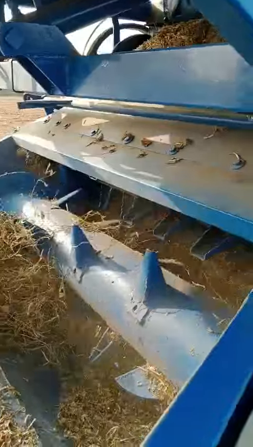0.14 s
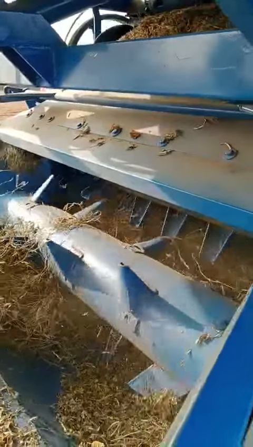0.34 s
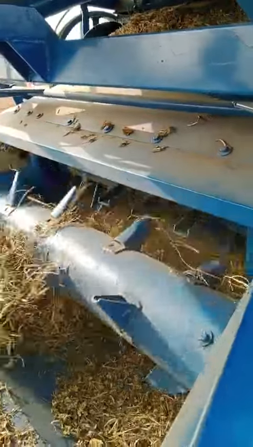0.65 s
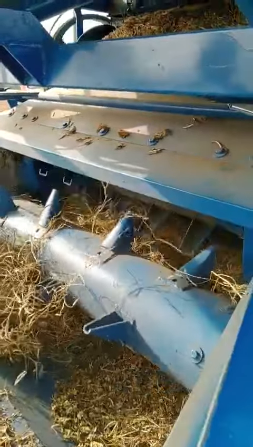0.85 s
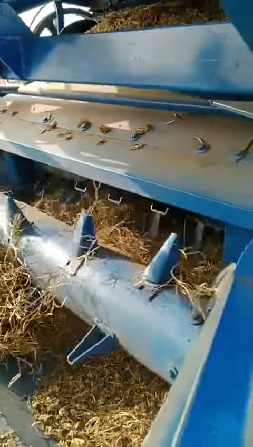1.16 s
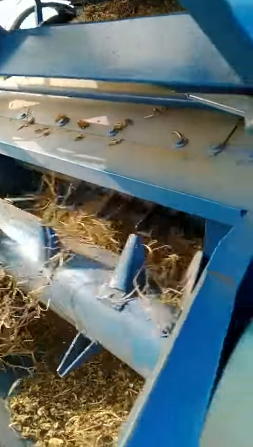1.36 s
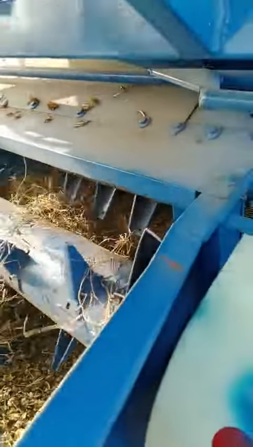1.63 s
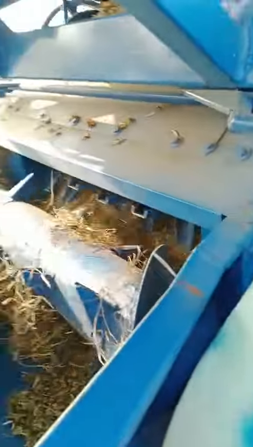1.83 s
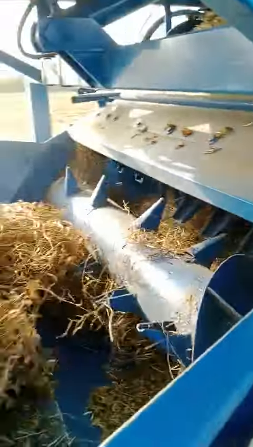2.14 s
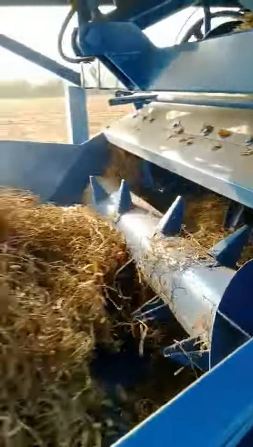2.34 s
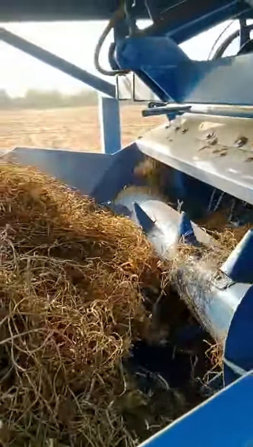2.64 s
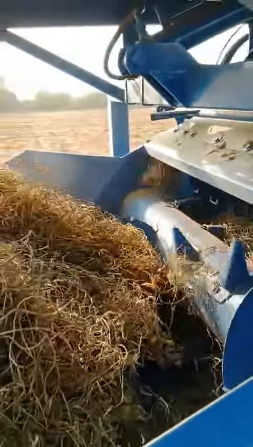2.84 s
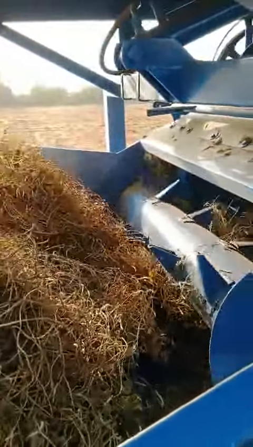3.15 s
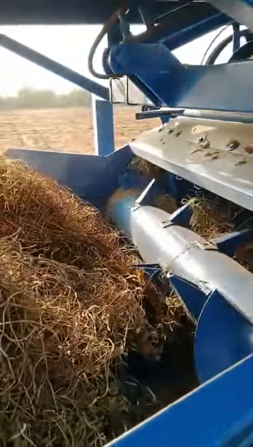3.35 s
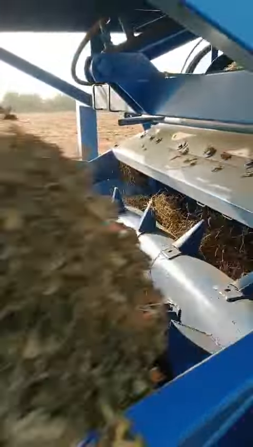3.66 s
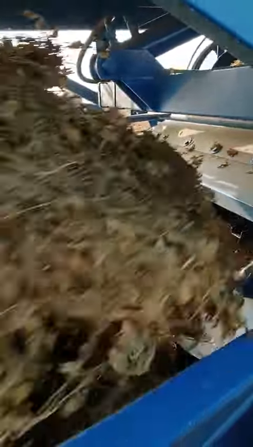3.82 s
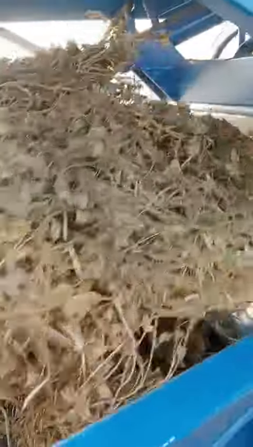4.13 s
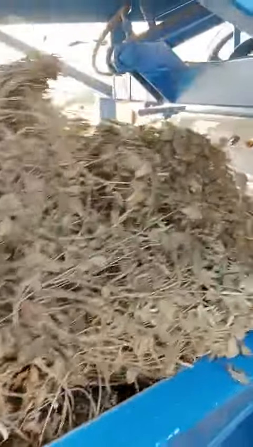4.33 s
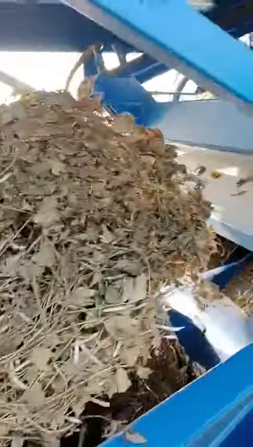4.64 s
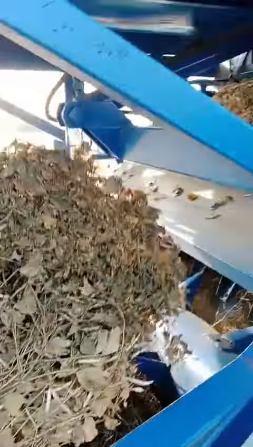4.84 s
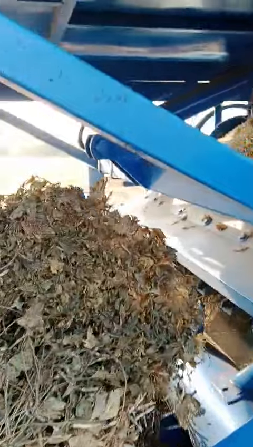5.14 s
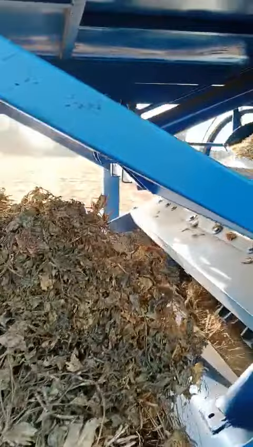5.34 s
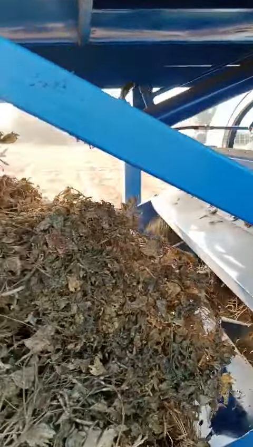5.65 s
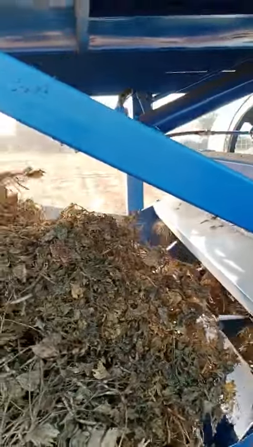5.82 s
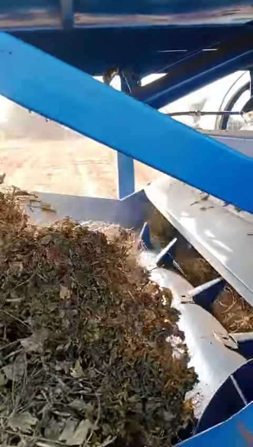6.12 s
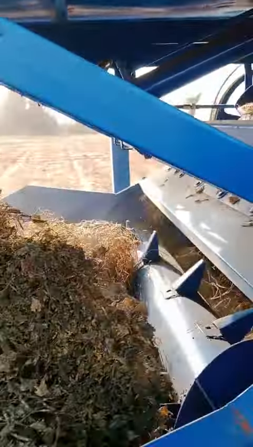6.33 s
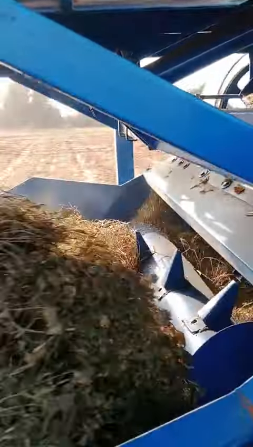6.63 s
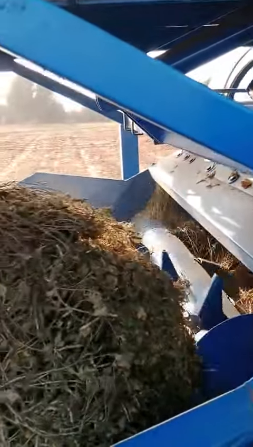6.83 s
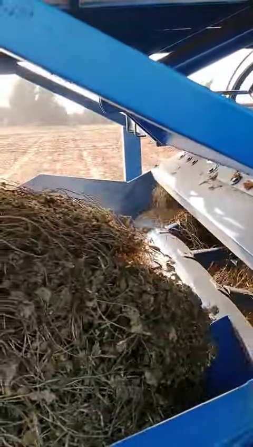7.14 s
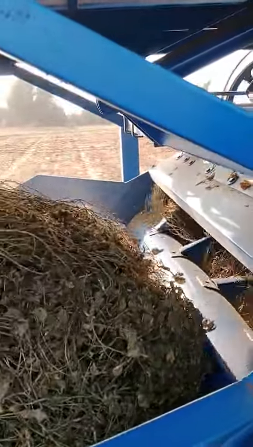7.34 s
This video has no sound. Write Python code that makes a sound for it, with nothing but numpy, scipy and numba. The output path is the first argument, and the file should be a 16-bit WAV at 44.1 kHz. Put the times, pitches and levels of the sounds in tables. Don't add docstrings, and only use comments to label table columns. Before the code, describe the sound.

A tractor-driven thresher roars steadily over a droning diesel, its steel casing knocking and ringing as dry crop rattles, ticks and snaps through.

```python
import sys
import numpy as np
from scipy import signal
from scipy.fft import rfft, irfft
from scipy.io import wavfile
from scipy.ndimage import uniform_filter1d
from numba import njit

SR = 44100
rng = np.random.default_rng(int(sys.argv[2]) if len(sys.argv) > 2 else 0)


def gain_from_db(level_db):
    decades = np.asarray(level_db, float) / 20
    return 10 ** decades


def file_out(sig):
    cols = np.atleast_2d(sig).T
    lim = np.clip(cols, -1, 1)
    pcm = np.round(lim * 32767).astype(np.int16)
    wavfile.write(sys.argv[1], SR, pcm)


N = 329868


def level(x, db):
    return x * gain_from_db(db) / np.sqrt(np.mean(x ** 2))


@njit
def svf(x, hz, width):
    y, band, low = np.empty(len(x)), 0., 0.
    g, k = np.tan(np.pi * hz / SR), width / hz
    for i in range(len(x)):
        v = (band + g * (x[i] - low)) / (1 + g * (g + k))
        band, low = 2 * v - band, low + 2 * g * v
        y[i] = k * v
    return y


def svf_twice(x, hz, width, second_width):
    return svf(svf(x, 1. * hz, 1. * width), 1. * hz, 1. * second_width)


def noise():
    return rng.standard_normal(N)


def walk(rate):
    hold = int(SR / rate)
    steps = np.repeat(rng.standard_normal(N // hold + 1), hold)
    return 1.42 * uniform_filter1d(uniform_filter1d(steps, hold), hold)[:N]


def flutter(rate):
    w = walk(rate)
    return w - uniform_filter1d(w, SR // 4)


def shape(hz, spectrum):
    f, db = np.transpose(spectrum)
    return gain_from_db(np.interp(np.log(hz + 1), np.log(f), db))


def colour(x, spectrum):
    return irfft(rfft(x) * shape(np.arange(N // 2 + 1) * SR / N, spectrum), N)


def knocks(rate, scatter_db):
    hit, size, sign = rng.random((3, N))
    return (hit < rate / SR) * gain_from_db(-scatter_db * np.log(1 - .97 * size)) * np.sign(sign - .5)


def bursts(times, peaks_db, lengths, rise):
    env, t = np.zeros(N), np.arange(SR // 2) / SR
    for s, db, length in zip(times, peaks_db, lengths):
        at = int(s * SR)
        blow = np.minimum(t / rise, 1) * np.exp(-(t / length) ** 1.77)
        env[at:at + len(t)] += (gain_from_db(db) * blow)[:N - at]
    return env


def thud(table, hz, width, gain_db, t60):
    s, db, _ = np.transpose(table)
    contact = level(svf_twice(noise(), hz, width, width), gain_db)
    return contact * bursts(s - .001, db, t60 / 5 + 0 * s, .0035)


def rings(table, gain_db, rise, t60):
    out, t = np.zeros(N), np.arange(SR // 2) / SR
    for s, db, f in table:
        at = int(s * SR)
        pair = np.sin(2 * np.pi * f * t) + .6 * np.sin(2 * np.pi * 1.035 * f * t)
        ring = pair * np.minimum(t / rise, 1) * 1000 ** (-t / t60)
        out[at:at + len(t)] += gain_from_db(db + gain_db) * ring[:N - at]
    return out


def panels(modes):
    out = 0
    for hz, width, db in modes:
        rain = knocks(300, 2.8) * gain_from_db(1.7 * flutter(8.7))
        out = out + level(svf_twice(rain, hz, width, 3.45 * width), db)
    return out


def curves(table):
    s, *columns = np.transpose(table)
    return (np.interp(np.arange(N) / SR, s, c) for c in columns)


def swells(table, rise, fall):
    s, *columns = np.transpose(table)
    late = np.arange(0, N + 64, 64)[:, None] / SR - s
    bell = np.exp(-(late / np.where(late < 0, rise, fall)) ** 2)
    return (np.interp(np.arange(N) / 64, np.arange(len(bell)), bell @ c) for c in columns)


# (time [s], firing rate [Hz])
SPEED = [
    (0, 50.68),
    (.75, 50.7),
    (1.75, 50.82),
    (2.25, 50.96),
    (2.75, 51.08),
    (4.25, 51.13),
    (5.5, 51.08),
    (6.75, 51.05),
    (7.48, 50.94),
]


def tones(table, waver_db, rate):
    hz, = curves(SPEED)
    turns = np.cumsum(hz) / SR
    out = 0
    for k, db in table:
        strength = gain_from_db(db + waver_db * min(k / 4, 1) * walk(rate))
        out = out + strength * np.sin(2 * np.pi * (k * turns + rng.random()))
    return out * np.sqrt(2)


# (order of the four-firing cycle [count], level [dB])
EXHAUST_ORDERS = [(4, -42), (8, -40), (9, -44), (11, -39), (12, -32), (13, -43), (14, -42), (16, -41),
                  (17, -43), (20, -38), (21, -41), (24, -36), (26, -41), (32, -47), (40, -46)]
# (speed [turns a firing], level [dB])
SHAFTS = [(1.145, -49), (1.371, -50), (1.429, -47), (1.622, -40), (1.713, -46), (4.856, -42), (5.903, -40),
          (6.098, -42), (6.56, -40)]


def diesel():
    exhaust = [(k / 4, db) for k, db in EXHAUST_ORDERS]
    return tones(exhaust + SHAFTS, 2.0, 3)


# (speed [turns a firing], level [dB])
GEAR_MESH = [(6.99, -1), (7.122, -1), (7.228, 0)]


def gears():
    return level(tones(GEAR_MESH, 2.04, 6), 0)


# (frequency [Hz], density [dB per Hz])
CHAFF = [(1500, -11), (2500, -18), (4000, -16), (6000, -3), (7600, 4), (9000, 1), (9350, -7), (9700, 3),
         (10200, 3.5), (11500, -2.5), (12800, 0), (16000, -5)]


def chaff(surge):
    ticks = signal.lfilter([1], [1, -.3], knocks(2500, 3.1)) * gain_from_db(0.56 * walk(22))
    hiss = noise() * gain_from_db(0.75 * flutter(18))
    return level(colour((level(ticks, -5) + hiss) * gain_from_db(0.64 * surge), CHAFF), 0)


# (time [s], level [dB])
RUSTLE = [
    (3.36, -55),
    (3.43, -34.5),
    (3.6, -30.5),
    (3.78, -29),
    (3.92, -33),
    (4.05, -40),
    (4.15, -60),
]


def rustle():
    grains = signal.lfilter([1], [1, -.985], np.abs(knocks(1800, 3.5)))
    db, = curves(RUSTLE)
    return gain_from_db(db) * level(colour(grains * noise(), CHAFF), 0)


# (time [s], peak level [dB])
SNAPS = [(0.475, -15), (0.937, -18), (1.997, -19), (2.729, -20), (4.949, -21), (5.875, -16), (6.512, -19),
         (6.9, -21), (7.03, -21), (7.08, -19), (7.386, -21), (3.4735, -19), (3.4894, -16), (3.5294, -15),
         (3.6164, -16), (3.6214, -21), (3.6494, -25), (3.6794, -21), (3.76, -16), (3.7714, -19),
         (3.7898, -13), (3.8854, -18)]


def snaps():
    s, db = np.transpose(SNAPS)
    return level(colour(noise(), CHAFF), -13.0) * bursts(s, db, 0.003 + 0 * s, .0004)


# (frequency [Hz], width [Hz], level [dB])
LOOSE_SHEET = [(613, 130, -1), (900, 105, 1.5), (1180, 150, -1), (1560, 160, -3), (2020, 180, -7.5)]


def clatter():
    clump = gain_from_db(6.5 * flutter(9))
    out = 0
    for hz, width, db in LOOSE_SHEET:
        out = out + level(svf_twice(knocks(70, 3.5) * clump, hz, width, 2 * width), db)
    return level(out, 0)


# (time [s], peak level [dB], body level [dB re peak], dust level [dB re peak])
SLAPS = [(0.129, -21, -15, -10), (0.477, -17.5, -3.5, -4), (0.493, -27.5, -7, -13), (0.9, -31, 1, -8),
         (0.936, -18.5, -7.5, -10), (0.955, -31, 3, -10), (1.33, -35, 2, -6), (1.415, -36, 2, -6),
         (6.9, -32, -10, 0), (0.645, -34, -2, -8), (1.128, -27, -19, -12), (1.215, -34, -4, -6),
         (1.94, -29, -6, -11), (1.992, -31.5, -11, 5), (2.7284, -22.5, -13, -13), (2.916, -34, -11, -11),
         (3.3594, -27.5, -6, -14), (3.417, -23.5, -7, -8), (4.0612, -27, -13, -11), (4.2614, -35, -10, 6),
         (4.6658, -26, -9.5, -15), (4.9482, -29, -11, -17), (5.102, -28, -14, -11), (5.8167, -27, -10, -11),
         (5.84, -24, -7, -12), (5.874, -14.5, -9, -10), (6.514, -28, -7, 7), (6.7794, -32, -10, -8),
         (7.0244, -26, -10, -5), (7.084, -22, -9, -2), (7.384, -30.5, 0.5, -6)]


def slaps():
    s, db, body_db, dust_db = np.transpose(SLAPS)
    length = 0.023 + .0003 * (db - db.mean())
    grit = colour(noise() + .4 * knocks(2000, 2.5), CHAFF)
    coarse = signal.sosfilt(signal.butter(4, 9300, "low", fs=SR, output="sos"), grit)
    fine = signal.sosfilt(signal.butter(4, 9300, "high", fs=SR, output="sos"), grit)
    spray = level(coarse, -8.5) * bursts(s - .002, db, length, 0.0074)
    dust = level(fine, -6.0) * bursts(s - .002, db + dust_db, length, 0.0046)
    body = level(svf(noise(), 2750.0, 3800.0), 0.5) * bursts(s - .003, db + body_db, length, 0.0027)
    return spray + dust + body


# (time [s], peak level [dB], ring [Hz])
POD_KNOCKS = [(0.298, -13, 797), (0.749, -16, 751), (0.837, -11, 783), (1.559, -15, 720), (1.85, -14, 719),
              (1.939, -19, 694), (2.025, -19, 880), (2.133, -16, 686), (2.705, -16, 690), (2.782, -15, 610),
              (3.082, -13, 689), (3.203, -15, 560), (3.637, -13, 790), (3.779, -17, 815), (4.691, -17, 703),
              (5.035, -16, 721), (5.137, -16, 1080), (5.264, -14, 622), (5.319, -12, 674),
              (5.512, -14, 751), (5.551, -15, 630), (5.693, -11, 670), (5.816, -12, 662), (6.009, -12, 458),
              (6.175, -13, 689), (6.232, -13, 690), (6.293, -15, 471), (6.406, -17, 694), (6.782, -13, 678),
              (6.877, -16, 517), (7.125, -13, 616), (7.225, -15, 501), (7.264, -10, 473), (7.459, -12, 692)]
# (time [s], peak level [dB], ring [Hz])
TAPS = [(0.0802, -21, 1560), (0.1022, -22, 1570), (0.2109, -20, 1420), (0.4, -23, 1550),
        (0.4753, -16, 1340), (0.7991, -22, 1630), (0.8994, -17, 1560), (0.9363, -16, 1540),
        (1.0375, -21, 1340), (1.2635, -22, 1440), (1.3054, -23, 1480), (1.3299, -22, 1540),
        (1.8462, -20, 1320), (2.7222, -19, 1460), (2.8374, -27, 1470), (2.8928, -28, 1590),
        (2.9592, -26, 1380), (3.1338, -23, 1370), (3.256, -24, 1500), (3.3583, -22, 1500),
        (3.3937, -21, 1420), (3.4241, -18, 1500), (3.5019, -24, 1530), (3.6032, -24, 1510),
        (3.7449, -17, 1350), (4.2063, -28, 1570), (5.0379, -22, 1430), (5.472, -28, 1600),
        (5.5672, -24, 1460), (5.8731, -18, 1300), (5.9179, -22, 1310), (6.0082, -23, 1400),
        (6.133, -24, 1540), (6.1714, -22, 1530), (6.4198, -22, 1430), (6.4687, -18, 1300),
        (6.6348, -14, 1450), (6.7426, -22, 1340), (6.8389, -20, 1380), (7.0319, -21, 1450),
        (7.1207, -21, 1340), (7.2529, -15, 1520)]


def pods():
    knock_t60, tap_t60 = 0.11, .06
    on_casing = rings(POD_KNOCKS, -9.0, .002, knock_t60) + thud(POD_KNOCKS, 840.0, 700., -17.0, knock_t60)
    on_feed_sheet = rings(TAPS, -6.0, .0015, tap_t60) + thud(TAPS, 2150.0, 2000., -17.0, tap_t60)
    return on_casing + on_feed_sheet


# (time [s], peak level [dB], ring [Hz])
THUMPS = [(0.067, -19, 676), (0.11, -17, 805), (0.474, -13, 920), (0.475, -14, 504), (0.494, -18, 915),
          (0.518, -18, 880), (0.558, -13, 880), (0.902, -9.5, 685), (0.837, -17, 800), (4.69, -18, 700),
          (2.5, -18, 560), (0.936, -13, 698), (1.328, -10, 680), (1.35, -19, 684), (1.376, -17, 730),
          (2.73, -14, 692), (3.129, -18, 880), (3.552, -23, 1054), (4.075, -21, 946), (4.243, -19, 830),
          (4.289, -21, 594), (4.949, -19, 733), (5.101, -18, 1087), (5.728, -19, 607), (5.918, -19, 703),
          (6.052, -17, 705), (6.107, -12, 758), (6.264, -27, 670), (6.629, -19, 810), (6.634, -16, 564),
          (6.7, -16, 563), (6.744, -16, 509), (6.53, -19, 520), (6.685, -15.5, 720), (6.752, -21, 646)]
# (time [s], peak level [dB], ring [Hz])
PINGS = [(0.645, -25, 2200), (1.0594, -21, 2170), (1.2156, -20, 1870), (1.6516, -24, 2160),
         (2.5994, -35, 1790), (2.7297, -31, 1910), (3.4131, -23, 1890), (4.0687, -27, 1810),
         (4.2413, -20, 1910), (4.2894, -34, 1930), (4.6823, -33, 2160), (4.9494, -22, 1970),
         (5.6361, -21, 2050), (5.7862, -28, 2050), (6.0646, -25, 2040), (6.2617, -20, 2050),
         (6.49, -19, 2020), (6.629, -16, 2000)]
# (time [s], peak level [dB], ring [Hz])
TINKS = [(1.2221, -31, 2760), (1.3344, -30, 3080), (1.9394, -33, 3020), (5.9194, -37, 2730),
         (6.0586, -30, 3140), (6.2617, -27, 2850), (6.3445, -32, 2840), (6.5494, -31, 2820),
         (6.628, -24, 3100), (6.684, -23, 3150), (7.3594, -29, 3260)]
# (time [s], peak level [dB], ring [Hz])
BOOMS = [(0.13, -18, 303), (0.57, -18, 304), (0.69, -15, 301), (0.83, -16, 297), (1.4, -15.5, 302),
         (2.26, -18, 254), (3.47, -19, 249), (3.6, -14, 300), (5.12, -17, 253), (6.01, -15, 302),
         (6.54, -13, 247), (4.15, -20, 253), (6.88, -16, 305), (7.1, -17, 304)]


def blows():
    thump_t60, ping_t60, tink_t60, boom_t60 = 0.14, 0.077, 0.057, 0.37
    thumps = thud(THUMPS, 1020.0, 950.0, -12.0, thump_t60) + rings(THUMPS, -4.0, 0.0025, thump_t60)
    pings = thud(PINGS, 1350.0, 1200.0, -8.5, ping_t60) + rings(PINGS, -4.5, 0.0034, ping_t60)
    tinks = thud(TINKS, 3400.0, 1200., -14, tink_t60) + rings(TINKS, -4, 0.0022, tink_t60)
    return thumps + pings + tinks + rings(BOOMS, -1.5, 0.018, boom_t60)


# (frequency [Hz], width [Hz], level [dB])
HOOD = [(689.8, 8.5, 0.5), (713, 25, -4.5)]
# (frequency [Hz], width [Hz], level [dB])
CHUTE = [(1081, 22, -3), (1138.5, 22.6, 1), (1210, 32, -6.5)]


def sheets(hood_db, chute_db):
    hood = gain_from_db(-38.5 + hood_db) * level(panels(HOOD), 0)
    return hood + gain_from_db(-36.5 + chute_db) * level(panels(CHUTE), 0)


# (frequency [Hz], width [Hz], level [dB])
CASING = [(82.5, 6.3, -42), (114.2, 10, -39.5), (138.5, 8.7, -39.5), (200.3, 4.9, -45), (253.9, 11.2, -36),
          (304, 13, -37), (332, 6.2, -44), (501.8, 11.6, -42.5), (747.4, 20, -40.5), (787.4, 13, -39.5),
          (944, 8.5, -43), (1560, 166, -42), (2050, 260, -44.5), (3080, 1140, -47.5), (3890, 370, -48.5),
          (646, 19, -42), (462.4, 8.5, -41.5), (556, 10, -45.5), (605, 14, -45)]


def casing(lift_db, low_db, deep_db):
    axle, low, rest = panels(CASING[:3]), panels(CASING[3:7]), panels(CASING[7:])
    return gain_from_db(deep_db) * axle + gain_from_db(low_db) * low + gain_from_db(lift_db) * rest


# (frequency [Hz], density [dB per Hz])
ROAR = [(24, -41), (40, -11.5), (140, -1.5), (207, 0), (358, -1), (436, -7.5), (697, -4.5), (1010, -8.5),
        (1140, -12), (1280, -12.5), (1550, -11.5), (2080, -25), (2590, -29), (3820, -22.5), (4300, -48),
        (5590, -73), (9460, -120)]


def roar(lift_db, low_db, deep_db, surge):
    out = 0
    for hz in 45 * 2 ** np.arange(0, 6.7, 1 / 4):
        band = svf_twice(noise(), hz, hz / 4, hz / 4)
        reach = min(hz / 630.0, 1)
        lean_db = lift_db * (hz > 400) + low_db * (170 < hz < 400) + deep_db * (hz < 170)
        stir_db = 1.25 * reach * surge + 1.2 * flutter(12)
        out = out + shape(hz, ROAR) * gain_from_db(stir_db + lean_db) * band
    return level(out, 0)


# (time [s], nearness [dB], facing the gearbox [dB], crop in the air [dB])
PHONE = [(0.0, 0.5, 4, 0), (0.2, 1.5, -0.5, -0.5), (0.9, 1.5, -3, -0.5), (1.05, -0.5, -4.5, -1.5),
         (1.5, -1, -3.5, 2.5), (2.5, -3, -0.5, 1.5), (2.95, -2.5, 2, -0.5), (3.4, -1.5, 5, 0.5),
         (4.05, -2.5, 6.5, 1), (4.7, -2, 3.5, -0.5), (5.45, -1, -1.5, -2), (5.75, 1, -2, -1.5),
         (6.7, 1.5, -1, -1), (7.25, 1, 0.5, -2), (7.48, -0.5, -10, 0)]
# (time [s], roar lift [dB], hood rung [dB], chute rung [dB])
WADS = [(0.1, 0.5, 6.5, -2), (0.3, -1, -2, 4), (0.5, 4, -2, -4), (0.91, 5, 11, 2), (1.07, 2, 5, 2),
        (1.18, -2, 0, -3), (1.35, 2, 11.5, 2), (1.57, 0, 7, 2), (1.8, 0, 10, 2), (1.95, 3.5, 13, -2),
        (2.1, -1.5, -1, -7), (2.42, 1.5, -2, 8), (2.73, 4, 14, 7), (3.07, 1, 11.5, 3), (3.42, 2, -6, 2),
        (3.57, 2.5, 2, 8), (3.75, 4, -3, 2), (4.08, 1.5, 3, -1), (4.27, 3.5, 4, 4), (4.6, -2, -3, -3),
        (4.95, 3, 2, 5.5), (5.16, -0.5, 10.5, 4), (5.4, -1.5, 3, 2), (5.93, 3.5, 13.5, 4), (6.1, 1, 10, 2),
        (6.32, -2, 4, 1), (6.52, 2, 3, -2), (6.68, 3, 7, 6), (7.1, 0, 0, 2), (7.41, 1.5, 6, 5)]
# (time [s], engine [dB], gears [dB], low panels [dB], axle [dB])
HEAVES = [(0.14, 3.5, 0.5, -5, 3), (0.6, 2, 2, 2, 5), (0.35, 3, -2, -1, 3), (0.82, -1.5, -8, 5, 1),
          (1.43, 3, 4, 3, -4), (1.8, 1, 6.5, -3, 3), (2.05, 3, 4.5, 2, 3), (2.28, -2, -2, 5, 4),
          (2.92, 5, 4, -3, -9), (3.38, 1.5, 3, -6, 0), (3.52, 0, -1.5, 4, 3), (3.65, -3, -1, 4, 3),
          (3.94, 8, 2.5, -2, -3), (4.12, 7, -5, 0.5, 3), (4.37, 2, 3.5, 4, -4), (4.72, -4, 3, 1.5, 3),
          (5.25, 1, -1, 0.5, 1), (5.38, -2, 6, -2, 0), (5.8, 0, 3, 1, -1), (6.08, 6, -1.5, -1, -1),
          (6.55, 0, 3, 2, -1), (6.68, 2, 4, -4, 2), (7.05, -1, 1.5, 0, -1), (7.27, 0, 0.5, 0, -4)]


def scene():
    near_db, facing_db, flying_db = curves(PHONE)
    lift_db, _, _ = swells(WADS, 0.021, 0.051)
    _, hood_db, chute_db = swells(WADS, 0.053, 0.11)
    engine_db, gear_db, low_db, deep_db = swells(HEAVES, 0.084, 0.084)
    surge = flutter(16)
    lift_db = lift_db + 1.5 * flutter(7)

    engine = gain_from_db(0.8 + 0.54 * engine_db) * diesel()
    gearbox = gain_from_db(-28.5 + facing_db + gear_db) * gears()
    husks = gain_from_db(-33 + flying_db) * chaff(surge)
    rattle = gain_from_db(-37.5 + lift_db) * clatter()
    drum = gain_from_db(-22) * roar(lift_db, 0.37 * low_db, deep_db, surge)
    shell = gain_from_db(-0.5) * casing(lift_db, low_db, deep_db)
    steady = engine + gearbox + husks + rattle + drum + shell + sheets(hood_db, chute_db)
    return (gain_from_db(near_db) * steady + rustle() + snaps() + slaps() + pods() + blows())[None]


def starve(x, under_db):
    hz, _, z = signal.stft(x, SR, nperseg=2048)
    power = np.abs(z[:1024].reshape(128, 8, -1)) ** 2
    weak = power.mean(axis=1) < power[40:48].mean() * gain_from_db(2 * under_db)
    keep = ~weak | (hz[:1024:8, None] < 1000)
    z[:1024] *= np.repeat(keep, 8, axis=0)
    return signal.istft(z, SR, nperseg=2048)[1][:N]


def roll_off(x):
    return signal.sosfilt(signal.butter(12, 17090, fs=SR, output="sos"), x)


# (frequency [Hz], width [Hz])
PORT_NOTCH = [(4760, 1570), (4890, 900)]
# (frequency [Hz], gain [dB])
PORT_TOP = [(13000, -.5), (13800, -6), (14600, -3), (15500, 1.5)]


def record(dry):
    x = np.tanh(.6 * dry[0]) / .6
    x = signal.sosfilt(signal.butter(4, 44, "high", fs=SR, output="sos"), x)
    for hz, width in PORT_NOTCH:
        x = x - svf(x, 1. * hz, 1. * width)
    x = x - .22 * svf(x, 2680., 300.)
    x = colour(x, PORT_TOP)
    x = signal.sosfilt(signal.ellip(12, .3, 90, 15720, fs=SR, output="sos"), x)
    mix = starve(x, under_db=-19.5)[None]
    return roll_off(mix)


dry = scene()
out = record(dry)
file_out(out)
```